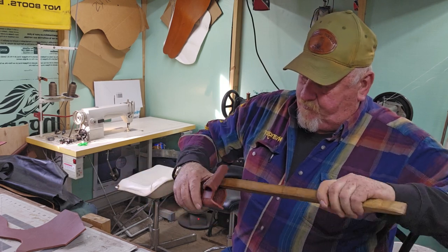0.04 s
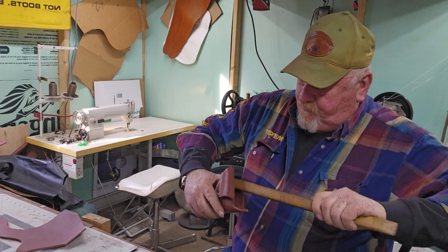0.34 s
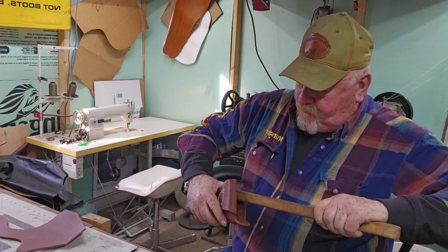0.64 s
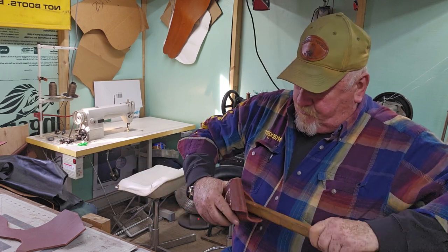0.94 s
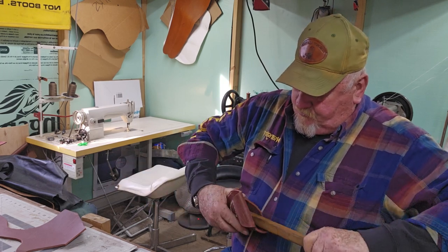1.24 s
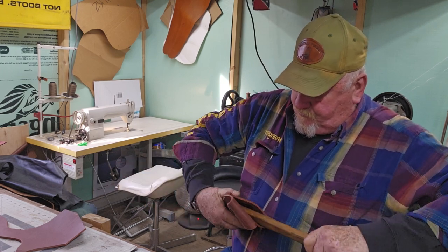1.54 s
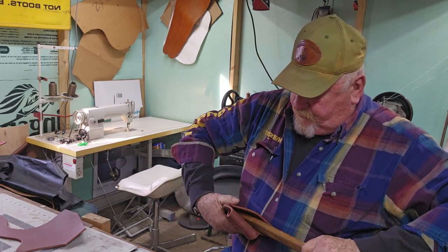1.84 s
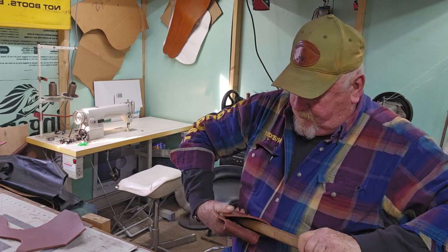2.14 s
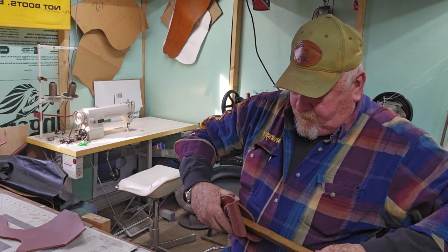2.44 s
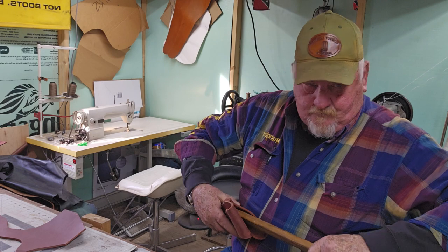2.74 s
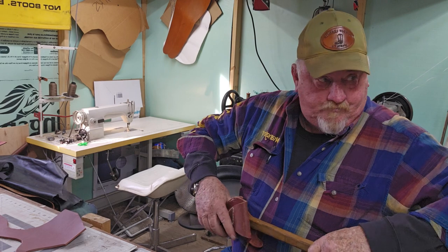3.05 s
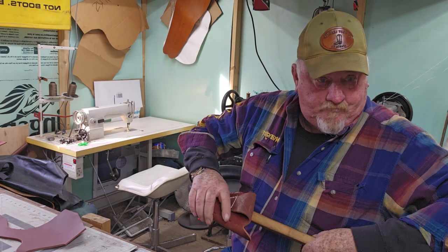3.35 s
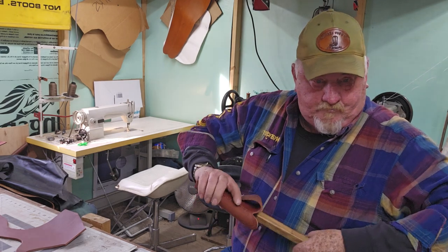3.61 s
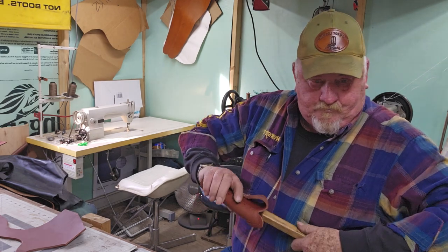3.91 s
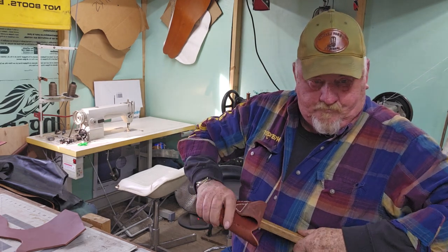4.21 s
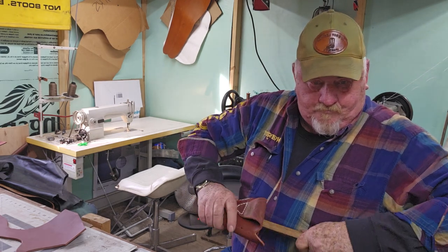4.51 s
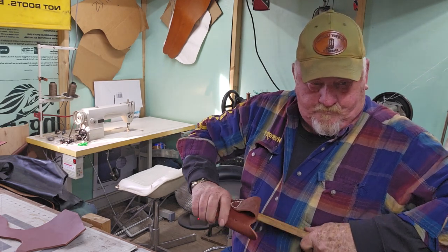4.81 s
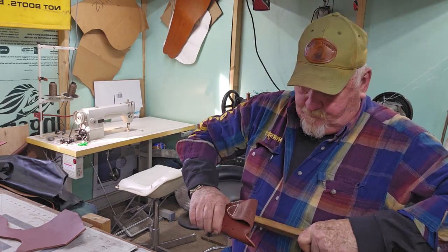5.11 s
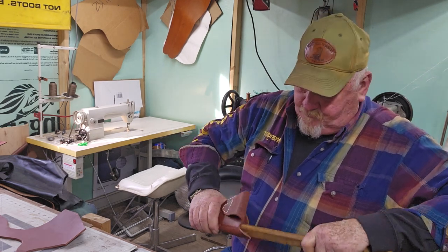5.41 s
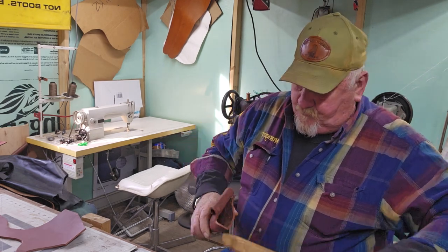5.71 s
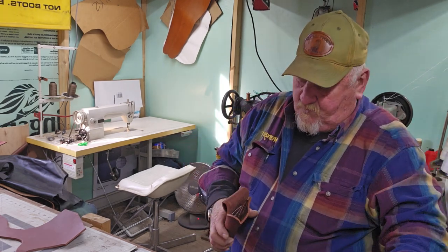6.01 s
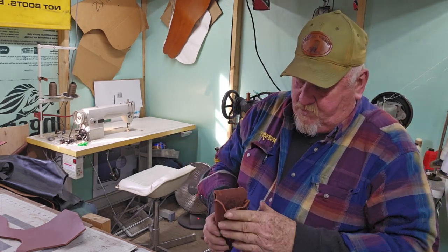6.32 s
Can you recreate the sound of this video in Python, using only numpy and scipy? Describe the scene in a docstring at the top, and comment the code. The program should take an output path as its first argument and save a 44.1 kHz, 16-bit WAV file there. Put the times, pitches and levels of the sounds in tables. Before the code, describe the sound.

A wooden handle rubs and scrapes inside stiff leather with small snaps, then knocks once on a bench in a quiet workshop.

```python
"""A small, quiet workshop, where a wooden handle is worked into a stiff leather sheath.
Sliding friction makes the strokes hiss and excites the hollow of the sheath, over a low thrum of hands
and sleeves. By stick-slip the leather catches and snaps against the wood. Then the stick is put down
on the bench: a light touch, a skid and one hard knock that sets the modes of the wood ringing."""
import sys
import numpy as np
from scipy import signal
from scipy.fft import rfft, irfft
from scipy.io import wavfile
from scipy.ndimage import map_coordinates

SR = 44100
rng = np.random.default_rng(int(sys.argv[2]) if len(sys.argv) > 2 else 0)


def to_wav(sig):
    """Store sig (one row per channel, or 1-D mono) as 16-bit WAV at the path in sys.argv[1].

    Samples outside -1..1 are clipped; the rate is SR.
    """
    pcm = np.clip(np.atleast_2d(sig), -1, 1) * 32767
    pcm = np.round(pcm).astype(np.int16)
    wavfile.write(sys.argv[1], SR, pcm.T)  # frames by channels


N = 284886
TIME = np.arange(N) / SR

# Steady room air. Each row: frequency in Hz, relative spectral level in dB.
AIR_SPECTRUM = [(25, -11), (70, 0), (120, -13), (180, -21), (260, -20), (400, -29), (1800, -36.5),
                (3300, -35.5), (4800, -30.5), (7000, -46), (10000, -63), (15000, -54)]
# Likeness of the two channels. Each row: frequency in Hz, left-right correlation.
COHERENCE = [(60, 0.97), (300, 0.75), (700, 0.4), (3000, 0.25), (7000, 0.074)]
# Reflections from bench and walls. Each row: left and right delay in seconds, relative level in dB.
ECHOES = [(.0044, 0.0047, 2), (.0066, 0.0056, 2.5)]
# Reverberation. Each row: frequency in Hz, time to fall 60 dB in seconds.
ROOM_T60 = [(100, 0.43), (300, 0.25), (900, 0.18), (2500, 0.19)]
# Imbalance of the microphone ports. Each row: frequency in Hz, left minus right in dB.
PORT_BALANCE = [(200, -0.26), (2400, 0.5), (4500, -4), (5700, -5), (7000, 12.5), (9000, 12.5), (11500, -4),
                (15000, -1.5)]

# Spectra of hands and sleeves, hollow rub, surface hiss, leather snap and wood crack.
# Each row: frequency in Hz, relative spectral level in dB.
THRUM_SPECTRUM = [(50, -15), (150, -8), (270, 6.5), (400, -2.5), (700, -9.5), (2000, -73)]
RUB_SPECTRUM = [(400, -36.5), (700, 1), (1000, 5), (1600, -4.5), (2400, 2), (3500, -19), (5000, -1.5),
                (8000, -45.5)]
HISS_SPECTRUM = [(1500, -13), (3000, 3.5), (4200, 3.5), (5200, 6), (6300, -5.5), (7500, -10.5),
                 (9000, -24.5), (10500, -35), (12000, -19.5), (15500, -34.5)]
SNAP_SPECTRUM = [(1000, -16.5), (1900, 4.5), (2800, 11), (4500, 1), (7000, -7), (10500, -35),
                 (13000, -31.5)]
CRACK_SPECTRUM = [(40, -46), (250, -19.5), (1300, -3), (3500, -11), (4800, 1), (6500, -13), (8500, -16.5),
                  (10500, -33), (13000, -29)]

# Raw leather edges rasping on wood. Each row: start in seconds, length in seconds, level in dB.
RASPS = [(0.838, 0.02, -62), (0.926, 0.051, -69), (4.35, 0.076, -85), (4.693, 0.077, -73),
         (5.593, 0.14, -76.5)]
# Stiff leather rumbling as it bends. Each row: start in seconds, length in seconds, level in dB.
FLEXES = [(0.66, 0.16, -63), (0.948, 0.15, -67), (4.475, 0.27, -67.5)]
# Wood sliding in leather. Each row: start in seconds, length in seconds, level in dB, tilt from rub to
# hiss in dB, share of the length at which it is fastest, pitch of the pinched leather in Hz.
STROKES = [(-0.04, 0.1, -70.5, 20.5, 0.21, 2030), (0.32, 0.044, -73.5, 7, 0.58, 3400),
           (0.419, 0.071, -64, 3, 0.74, 4000), (0.655, 0.14, -65, -5.5, 0.12, 1390),
           (0.797, 0.038, -64, 2, 0.3, 5000), (1.257, 0.31, -65.5, -4, 0.18, 3780),
           (1.581, 0.14, -64, -1, 0.41, 4800), (1.758, 0.13, -68.5, -2, 0.75, 3160),
           (2.011, 0.26, -64, 0.5, 0.72, 2574), (2.28, 0.082, -69.5, -8, 0.17, 2370),
           (2.33, 0.14, -66, 2, 0.34, 1310), (2.597, 0.11, -72, -0.5, 0.61, 4670),
           (2.833, 0.042, -76.5, 4, 0.5, 4670), (3.632, 0.27, -76, 4.5, 0.18, 1990),
           (4.0, 0.3, -69.5, -10, 0.72, 1960), (4.299, 0.17, -63, -7.5, 0.53, 1420),
           (4.437, 0.46, -69.5, 0.5, 0.47, 2600), (4.663, 0.097, -62, 1.5, 0.78, 2370),
           (4.8, 0.37, -69.5, -6.5, 0.5, 3300), (5.395, 0.045, -72.5, 4, 0.56, 4600),
           (5.765, 1, -74, -0.5, 0.053, 1000), (6.248, 0.37, -73.5, -2, 0.7, 3680)]
# Hollow of the sheath. Each row: frequency in Hz, bandwidth in Hz, gain in dB.
SHEATH_MODES = [(957, 73, -4.5), (1406, 420, -8)]
# Leather catching. Each row: time in seconds, level in dB, thud and snap offsets in dB,
# pitch of the hollow in Hz.
CATCHES = [(0.672, -47.5, -7, -3.5, 810), (0.839, -38.5, -12.5, -17, 870), (0.929, -52.5, -4, 7.5, 1120),
           (0.945, -42, -11.5, -4.5, 1000), (1.127, -54.5, -21, -20, 1000), (1.262, -45.5, -26, -12, 990),
           (1.941, -52.5, -14, 5.5, 1310), (2.048, -39, -44, 9, 980), (2.447, -52.5, -8.5, -30, 1260),
           (2.474, -49, -12, -30, 547), (2.605, -59, 2.5, -6, 483), (4.453, -54.5, -8, -7, 760),
           (4.667, -54, -11, -16, 580), (5.157, -54, -12, -14, 784), (5.241, -52, -23, -6.5, 879.4),
           (5.492, -51.5, -10, -4, 820), (5.505, -53, -18, -8, 450), (6.277, -54.5, 2.5, -1, 2020)]
# The handle, held in the hand. Each row: frequency in Hz, relative level in dB.
HANDLE_MODES = [(1250, -0.5), (1570, -4), (2080, -1), (2680, -3)]
# Stick meeting the bench and settling. Each row: time in seconds, strength in dB, brightness in Hz.
KNOCKS = [(6.0172, -10.5, 3460), (6.018, 0, 240), (6.0753, 3, 3480), (6.109, -15.5, 9000),
          (6.277, -19.5, 242), (6.449, -22, 217)]
# Stick and bench ringing together. Each row: frequency in Hz, relative level in dB, T60 in seconds.
WOOD_MODES = [(114, -33.5, 0.44), (152.7, -26, 0.065), (248.6, -18.5, 0.075), (298.4, -18, 0.092),
              (326, -21, 0.089), (371, -32.5, 0.18), (470, -13.5, 0.052), (645, -19.5, 0.063),
              (732, -17.5, 0.055), (839, -21.5, 0.072), (980, -19, 0.035), (1093, -25, 0.05),
              (1262, -18, 0.066), (1366, -19, 0.07), (1563, -14, 0.074), (1917, -23.5, 0.07),
              (2267, -26, 0.18), (2894, -18.5, 0.082), (3470, -29, 0.092), (4720, -23, 0.043),
              (5160, -20.5, 0.059)]

POCKET_BEND, BENDS_PER_S = 0.028, 4   # the pocket gives: its pitch wanders by this share, this often


def from_db(db):
    """Amplitude grows tenfold every 20 dB."""
    return 10 ** (np.asarray(db) / 20)


def unit_rms(x):
    """Normalisation to unit mean power."""
    return x / np.sqrt(np.mean(x ** 2) + 1e-20)


def at_hz(points, hz):
    """Interpolation of a table on a logarithmic frequency axis."""
    f, value = np.transpose(points)
    return np.interp(np.log(np.maximum(hz, 1)), np.log(f), value)


def convolve(x, impulse):
    """Causal convolution gives the output of a linear system, channels x N."""
    return signal.oaconvolve(np.atleast_2d(x), np.atleast_2d(impulse), axes=-1)[:, :N]


def butterworth(x, hz, kind):
    """Butterworth filtering, flat in the passband."""
    return signal.sosfilt(signal.butter(2, hz, kind, fs=SR, output="sos"), x)


def minimum_phase(points, size=4096):
    """Folding the cepstrum gives the minimum-phase impulse response of a spectrum."""
    cepstrum = irfft(np.log(from_db(at_hz(points, np.fft.rfftfreq(size, 1 / SR)))))
    cepstrum[1:size // 2] *= 2
    cepstrum[size // 2 + 1:] = 0
    return irfft(np.exp(rfft(cepstrum)))


def colour(x, points):
    """Source and filter: a white excitation takes on a spectrum and keeps its energy."""
    impulse = minimum_phase(points)
    return convolve(x, impulse / np.linalg.norm(impulse))


def resonance(hz, width):
    """A damped resonator as two-pole filter coefficients, with unit peak gain."""
    r = np.exp(-np.pi * width / SR)
    return np.array([1, 0, -1]) * (1 - r * r) / 2, [1, -2 * r * np.cos(2 * np.pi * hz / SR), r * r]


def drift(per_s):
    """Slow random modulation with a spread near 1."""
    knots = rng.standard_normal(N // 20)
    return np.interp(TIME * per_s, np.arange(len(knots)), knots)


def stereo_noise(size):
    """Partial coherence: white noise, alike on both sides in the bass and unrelated in the treble."""
    mid, side = rfft(rng.standard_normal((2, size)))
    alike = at_hz(COHERENCE, np.fft.rfftfreq(size, 1 / SR))
    return irfft(np.sqrt((1 + alike) / 2) * mid + np.sqrt((1 - alike) / 2) * side * [[1], [-1]], size)


def room_air(db):
    """Stationary noise: the low, steady sound of the room's air."""
    return from_db(db) * colour(stereo_noise(N), AIR_SPECTRUM)


def workshop_response(build_s, bands=9):
    """Reverberation: returns early reflections and a diffuse tail that decays band by band."""
    t = TIME[:SR // 2]
    early = np.zeros((2, len(t)))
    for left_s, right_s, db in ECHOES:
        early[[0, 1], [int(left_s * SR), int(right_s * SR)]] += from_db(db)
    noise, tail = stereo_noise(len(t)), 0
    edges = np.geomspace(60, 17000, bands + 1)
    for low, high in zip(edges, edges[1:]):
        decay = from_db(-60 * t / at_hz(ROOM_T60, np.sqrt(low * high)))
        tail = tail + decay * butterworth(noise, [low, high], "band")
    return early, unit_rms(tail * (1 - np.exp(-t / build_s))) / np.sqrt(len(t))


def swell(start, length, crest):
    """Amplitude follows a power of the speed, which peaks at the share `crest` of a movement."""
    speed = np.interp(TIME, start + length * np.array([0, crest, 1]), [0, 1, 0])
    return speed ** 0.75


def friction(per_s, spread_db, smooth, flutter_db):
    """Friction noise: countless tiny slips of the leather's grain, in clumps, over a smooth rush."""
    sizes = from_db(spread_db * np.minimum(rng.exponential(1, N), 4)) * rng.standard_normal(N)
    slips = unit_rms(sizes * (rng.random(N) < per_s / SR))
    return unit_rms((slips + smooth * rng.standard_normal(N)) * from_db(flutter_db * drift(76)))


def edge_rasp(crest=0.21, low_hz=7200):
    """Brief impulses are rich in treble: stiff fibres on a cut edge flick past the wood."""
    gain = sum(from_db(db) * swell(start, length, crest) for start, length, db in RASPS)
    fibres = friction(per_s=810, spread_db=19.0, smooth=1.0, flutter_db=12)
    return gain * unit_rms(butterworth(fibres, low_hz, "high"))


def stroke_gains(rub_db=-1.5, hiss_db=-0.5, thrum_db=-8.5, uneven_db=1.5):
    """Incoherent sources add in power: returns the rub, hiss and thrum gains of strokes and bends."""
    power = np.zeros((3, N))
    for start, length, db, tilt_db, crest, _ in STROKES:
        levels = [[db - tilt_db / 2 + rub_db], [db + tilt_db / 2 + hiss_db], [db + thrum_db]]
        power += (from_db(levels) * swell(start, length, crest)) ** 2
    for start, length, db in FLEXES:
        power[2] += (from_db(db) * swell(start, length, crest=0.14)) ** 2
    return np.sqrt(power) * from_db(uneven_db * drift(per_s=26))   # the hand pushes unevenly


def shifting_grip(x, ring_s, per_s, share, count=4):
    """Coupling depends on position: a travelling contact excites a changing mix of resonances."""
    t = TIME[:SR // 25]
    rings = rng.standard_normal((count, len(t))) * np.exp(-t / ring_s)
    rings /= np.linalg.norm(rings, axis=1, keepdims=True)
    coupling = np.array([drift(per_s) for _ in range(count)])
    coupling /= np.linalg.norm(coupling, axis=0)
    return unit_rms(x + share * convolve(x * coupling, rings).sum(axis=0))


def sheath_pocket(drag):
    """Cavity resonance: the pocket's hollow tones glide up and down as it changes shape."""
    rub = colour(drag, RUB_SPECTRUM)[0]
    hollow = sum(from_db(db) * signal.lfilter(*resonance(hz, width), rub)
                 for hz, width, db in SHEATH_MODES)
    position = np.cumsum(1 + POCKET_BEND * drift(BENDS_PER_S))
    return unit_rms(map_coordinates(rub + hollow, [position], order=3, mode="mirror"))


def pinched_leather(slide, q=16, block=128):
    """Forced resonance: the pinched strip sings at each stroke's pitch, gliding where they overlap."""
    weights = [swell(start, length, crest) + 1e-9 for start, length, _, _, crest, _ in STROKES]
    hz = np.dot([row[-1] for row in STROKES], weights) / np.sum(weights, axis=0)
    hz *= 1 + POCKET_BEND * drift(BENDS_PER_S)
    creak, state = np.zeros(N), np.zeros(2)
    for i in range(0, N, block):
        width = hz[i] / q
        drive = slide[i:i + block] / np.sqrt(width)
        creak[i:i + block], state = signal.lfilter(*resonance(hz[i], width), drive, zi=state)
    return unit_rms(creak)


def rubbing(pinch_db=-6.5, crackles_per_s=180, crackle_db=-11):
    """Sliding friction drives pocket and pinched strip; the surface hisses, hands and sleeves thrum."""
    rub, hiss, thrum = stroke_gains()
    drag = friction(per_s=700, spread_db=2.5, smooth=0.49, flutter_db=1)
    drag = shifting_grip(drag, ring_s=0.0033, per_s=7, share=0.99)
    slide = friction(per_s=1300, spread_db=6.0, smooth=0.9, flutter_db=3.5)
    slide = shifting_grip(slide, ring_s=0.0041, per_s=9, share=1.1)
    pocket = rub * sheath_pocket(drag)
    creak = from_db(pinch_db) * np.sqrt(rub * hiss) * pinched_leather(slide)
    # single fibres crackle as they let go
    fibres = unit_rms(rng.standard_normal(N) * (rng.random(N) < crackles_per_s / SR))
    surface = hiss * (colour(slide, HISS_SPECTRUM) + from_db(crackle_db) * colour(fibres, SNAP_SPECTRUM))
    sleeves = thrum * colour(rng.standard_normal(N), THRUM_SPECTRUM)
    return pocket + creak + surface + sleeves


def handle_tap(t, t60_s=0.018):
    """Damped free vibration: each contact favours other modes, and the hand soon stills them."""
    modes = sum(from_db(db + 2 * rng.standard_normal()) * (-1) ** k * np.sin(2 * np.pi * hz * t)
                for k, (hz, db) in enumerate(HANDLE_MODES))
    return from_db(-60 * t / t60_s) * modes


def leather_catches(crush, thud_db, body_db, hollow_db, snap_db, handle_db):
    """Stick-slip: a catch lets go with a crackle, a bump and a tap; the stick rebounds in the pocket."""
    hold_s, soft_slip_s, hard_slip_s = 0.001104, 0.01, 0.0051
    rebound_s, rebound_slip_db, rebound_bump_db = 0.015, -6.5, -4
    half_hard_db, hollow_q = 29, 7
    pushes, rings, t = np.zeros((3, N + SR)), np.zeros(N + SR), TIME[:SR // 10]
    for start, db, thud, snap, hollow_hz in CATCHES:
        hardness = 1 / (1 + from_db(half_hard_db + thud - snap))
        slip_s = soft_slip_s + hardness * (hard_slip_s - soft_slip_s)
        gains = from_db([[db + thud], [db + body_db], [db + snap]])
        rebound = (rebound_s, from_db(rebound_slip_db) * (1 - hardness) ** 2, from_db(rebound_bump_db))
        for delay, strength, bump in ((0, 1, 1), rebound):
            at = int((start + hold_s + delay) * SR)
            slip = crush * rng.standard_normal(len(t)) * np.exp(-t / slip_s)
            slip[0] = hardness
            pushes[:, at:at + len(t)] += strength * gains * slip / np.linalg.norm(slip)
            # stick and pocket ring briefly together, at a pitch set by the grip
            hollow = signal.lfilter(*resonance(hollow_hz, hollow_hz / hollow_q), slip)
            rings[at:at + len(t)] += bump * from_db(db + hollow_db) * hollow / np.linalg.norm(hollow)
        at = int((start + hold_s) * SR)
        rings[at:at + len(t)] += from_db(db + handle_db) * handle_tap(t)
    thuds = from_db(thud_db) * colour(pushes[0], THRUM_SPECTRUM)
    snaps = from_db(snap_db) * colour(pushes[2], SNAP_SPECTRUM)
    return thuds + colour(pushes[1], RUB_SPECTRUM) + snaps + rings[:N]


def skid(start_s=6.03, end_s=6.074, db=-32.5, growth_db=17.5, hz=3500, count=6):
    """Intermittent contact: small, growing impacts between touch and full blow, in rows like KNOCKS."""
    progress = (np.arange(count) + rng.random(count)) / count
    return [(start_s + p * (end_s - start_s), db + p * growth_db, hz) for p in progress]


def wood_crack(t, decay_s=0.0075, scatter=0.12):
    """Modal overlap: many short-lived modes merge into a crack, different at each point of contact."""
    crack = scatter * stereo_noise(len(t)) * np.exp(-t / decay_s)
    crack[:, 0] += 1
    return crack / np.linalg.norm(crack, axis=1, keepdims=True)


def wood_clack(t, db, hz=1390, db_per_octave=15.5, length_cycles=2.87):
    """Mass lowers pitch: a harder blow swings more wood, for a few cycles, and clacks lower."""
    cycles = hz * 2 ** (-db / db_per_octave) * t
    return np.sin(np.pi * np.minimum(cycles / length_cycles, 1)) * np.sin(2 * np.pi * cycles)


def wood_ring(t, lag_s=0.0001):
    """Modal radiation: each decaying mode radiates its own way and reaches the two ports out of step."""
    ring = 0
    for k, (hz, db, t60) in enumerate(WOOD_MODES):
        lag = lag_s * (-1) ** (k // 2) * np.array([[1], [-1]])
        ring = ring + (-1) ** k * from_db(db - 60 * t / t60) * np.sin(2 * np.pi * hz * (t + lag))
    return ring


def stick_knock(ring_db, crack_db, clack_db, left_lag_s):
    """Impact excitation: each contact is a short, rounded push that cracks, clacks and rings the wood."""
    force, cracks, clacks = np.zeros(N + SR), np.zeros((2, N + SR)), np.zeros(N + SR)
    t, push_t = TIME[:SR // 2], TIME[:SR // 200]
    for start, db, hz in KNOCKS + skid():
        at = int(start * SR)
        push = push_t * np.exp(-2 * np.pi * hz * push_t)
        push = from_db(db) * push / push.sum()
        force[at:at + len(push)] += push
        crack = convolve(wood_crack(t), push)
        cracks[:, at:at + crack.shape[1]] += crack
        clack = np.convolve(wood_clack(t, db), push)
        clacks[at:at + len(clack)] += clack
    left, right = (from_db(ring_db) * convolve(force, wood_ring(t))
                   + from_db(crack_db) * colour(cracks, CRACK_SPECTRUM)
                   + from_db(clack_db) * clacks[:N])
    left = np.interp(TIME - left_lag_s, TIME, left)   # the stick lands right of the microphone
    return butterworth([left, right], 60, "high")   # a small body radiates no deep bass


def scene():
    """Superposition: the direct sound of nearby handwork, its reflections and the room's air."""
    early, tail = workshop_response(build_s=0.00081)
    rub = rubbing() + edge_rasp()
    catches = leather_catches(crush=0.16, thud_db=26, body_db=9.5, hollow_db=15,
                              snap_db=16.5, handle_db=-9.0)
    knock = stick_knock(ring_db=-3.5, crack_db=7.5, clack_db=-5.5, left_lag_s=0.0001)
    rub = rub + convolve(rub, 0.43 * early + from_db(2.5) * tail)
    catches = catches + convolve(catches, 0.27 * early + from_db(-3.0) * tail)
    # the knock starts on the bench itself, so only the walls answer it
    knock = knock + convolve(knock, from_db(-2.5) * tail)
    return rub + catches + knock + room_air(db=-59.5)


def record(dry, cutoff_hz=15900):
    """Frequency response: the two microphone ports colour the treble differently; the top is cut."""
    ports = [minimum_phase([(hz, side * db / 2) for hz, db in PORT_BALANCE]) for side in (1, -1)]
    lowpass = signal.ellip(10, .1, 90, cutoff_hz, fs=SR, output="sos")
    return signal.sosfilt(lowpass, convolve(dry, ports))


dry = scene()
out = record(dry)
to_wav(out)
```